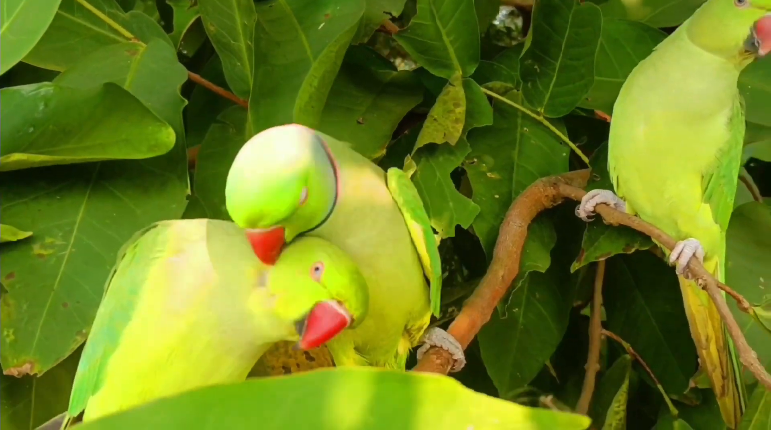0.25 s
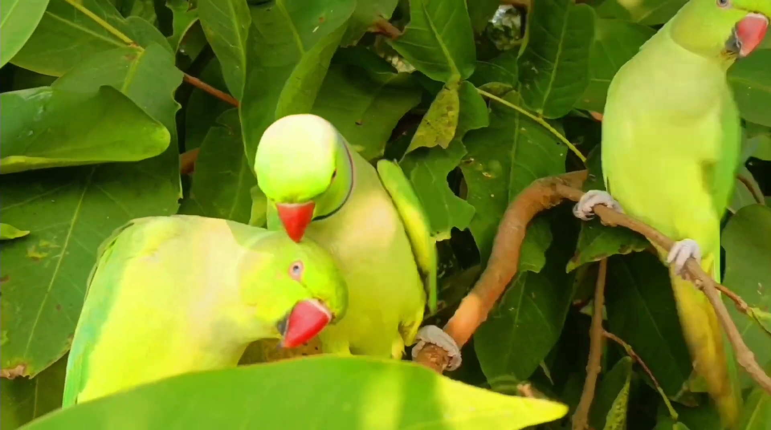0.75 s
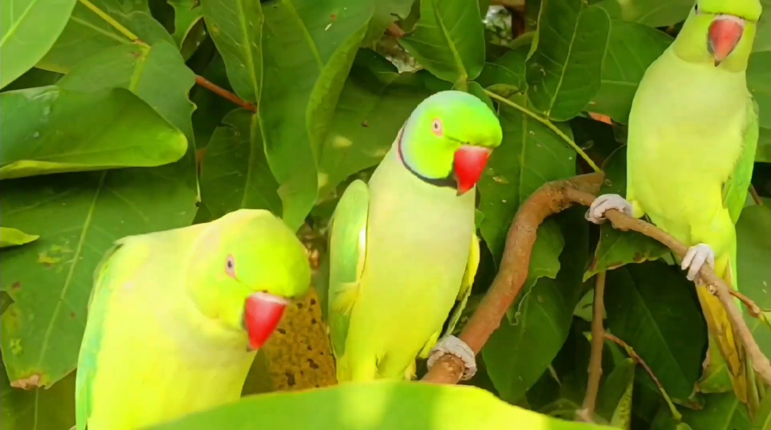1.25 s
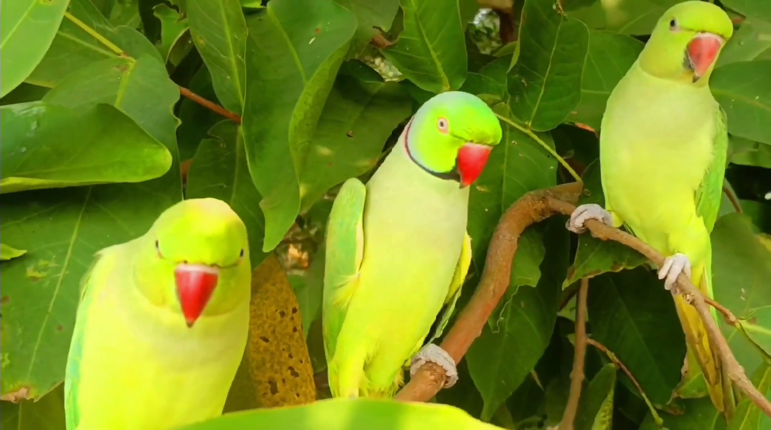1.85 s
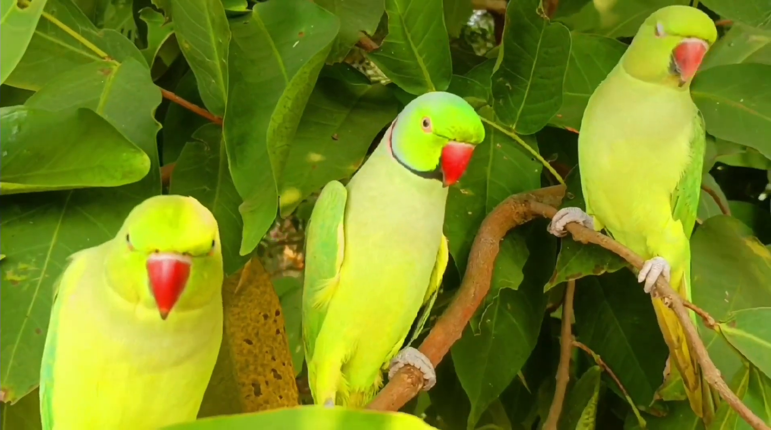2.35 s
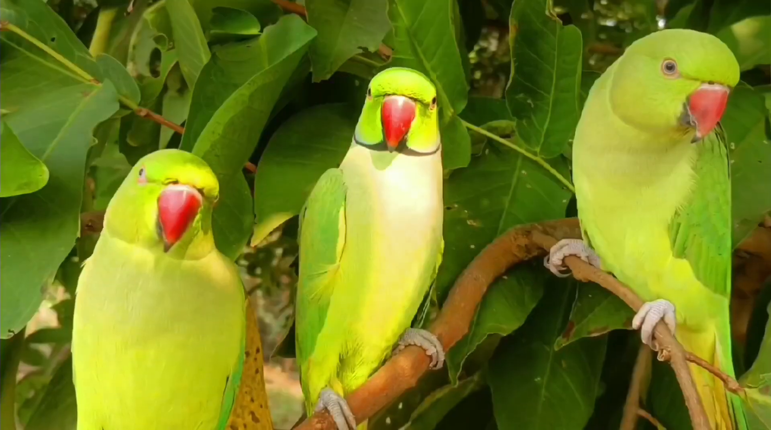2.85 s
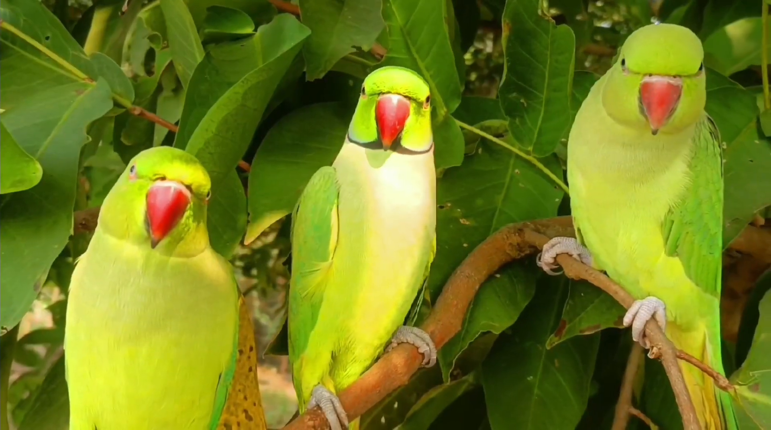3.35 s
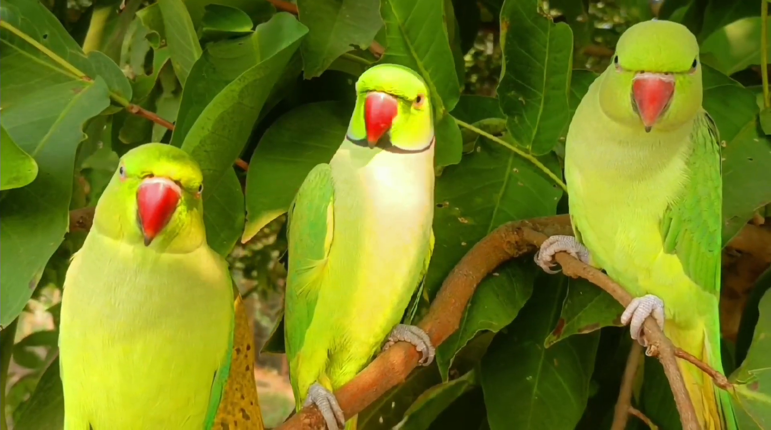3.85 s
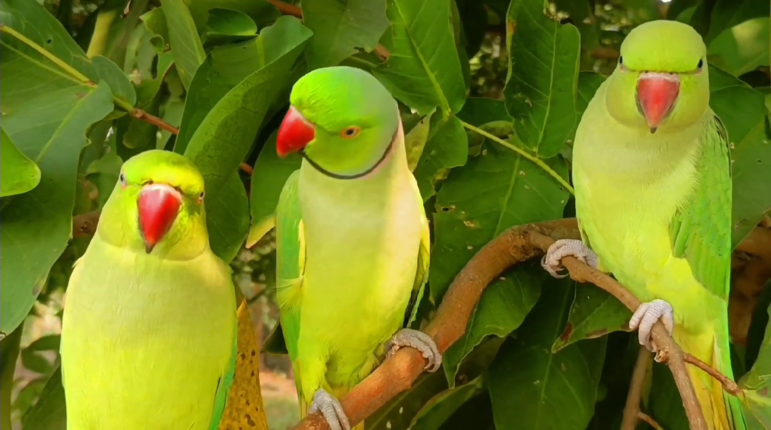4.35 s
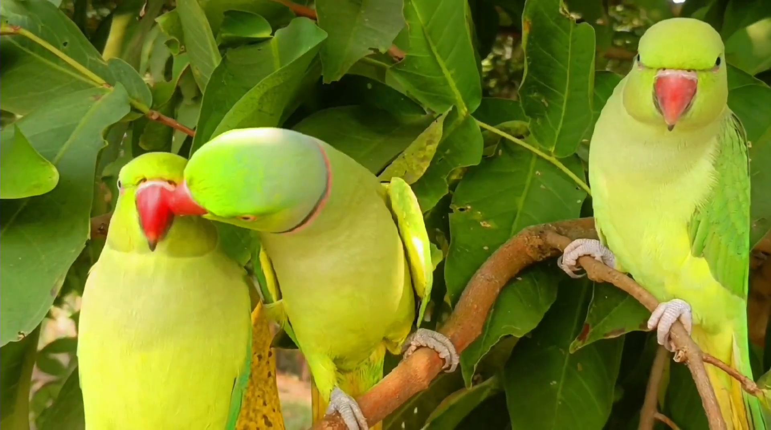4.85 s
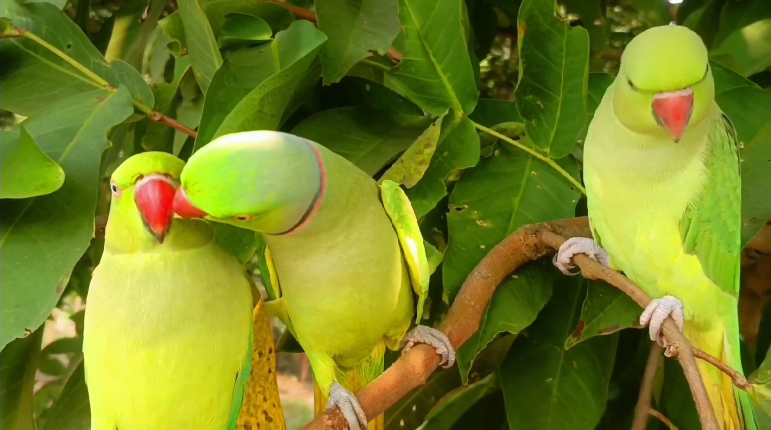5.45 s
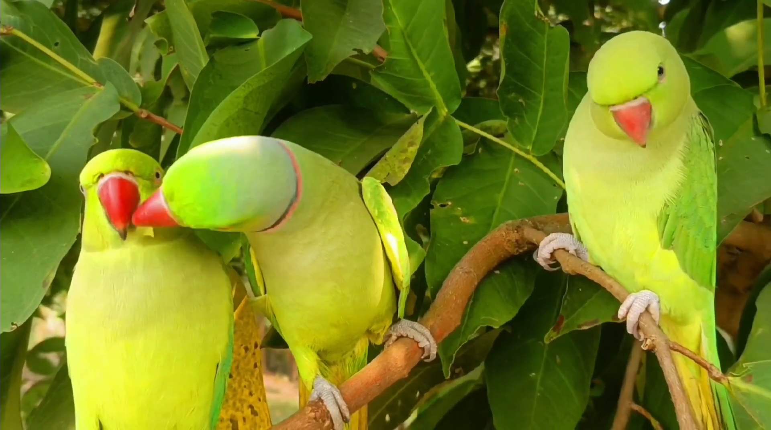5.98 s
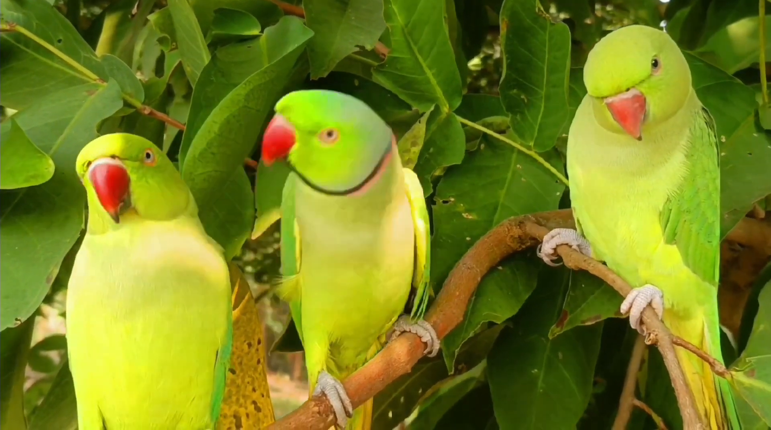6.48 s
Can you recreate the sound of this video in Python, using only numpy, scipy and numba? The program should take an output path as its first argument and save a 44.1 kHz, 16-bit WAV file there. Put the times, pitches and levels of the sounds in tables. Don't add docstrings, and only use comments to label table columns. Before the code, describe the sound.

A garden with steady low traffic-like hum, soft hiss and a faint haze of birdsong. At 0 s a close parakeet screeches loudly: a piercing falling onset breaks into a rough rasp, ending by 0.36 s. Feathers and dry leaves rustle until about 0.7 s, with dull twig knocks toward the right and a small tick. At 1.3 s the close rumble cuts out abruptly; distant twitters, thin paired peeps on the right and, from 1.8 to 4.4 s, a soft burred and clear warble are exposed. The rumble returns at 4.1 s with rustling and beak ticks. From 4.45 s a loud, clean squeal slowly rises and brightens, cracks at 5.05 s, then falls with airy hiss until 5.28 s. Taps precede a second, sharper rasping screech at 5.6-5.95 s. Light rustling, faint peeps and far twitters close the scene, to about 6.7 s.

```python
import sys
import numpy as np
from scipy import signal
from scipy.fft import rfft, irfft
from scipy.io import wavfile
from scipy.ndimage import uniform_filter1d
from numba import njit

SR = 44100
rng = np.random.default_rng(int(sys.argv[2]) if len(sys.argv) > 2 else 0)


def to_linear_factor(level_db):
    exponent = np.asarray(level_db, float) / 20
    return 10 ** exponent


def digitize_waveform(pressure):
    field = np.atleast_2d(pressure).T
    bounded = np.clip(field, -1, 1)
    quanta = np.round(bounded * 32767).astype(np.int16)
    wavfile.write(sys.argv[1], SR, quanta)


N = 296352
FLASH_HZ = 6440


def level(x, db):
    return x * to_linear_factor(db) / np.sqrt(np.mean(x ** 2))


def colour(x, spectrum):
    hz, db = np.transpose(spectrum)
    gain_db = np.interp(np.log(np.fft.rfftfreq(N, 1 / SR) + 1), np.log(hz), db)
    return irfft(rfft(x) * to_linear_factor(gain_db), N)


def band(x, lo_hz, hi_hz):
    sos = signal.butter(4, [lo_hz, hi_hz], "bandpass", fs=SR, output="sos")
    return signal.sosfiltfilt(sos, x)


def steady(x, span_s=0.018):
    return x / np.sqrt(uniform_filter1d(x ** 2, int(span_s * SR)) + 1e-12)


def walk(rate):
    k = max(int(SR / rate), 2)
    steps = np.repeat(rng.standard_normal(N // k + 1), k)
    return 1.3 * uniform_filter1d(uniform_filter1d(steps, k), k)[:N]


def echo(x, t60, wet_db):
    t = np.arange(int(.5 * SR)) / SR
    tail = rng.standard_normal(len(t)) * np.exp(-np.log(1000) * t / t60)
    tail = tail / np.sqrt(np.sum(tail ** 2))
    return x + to_linear_factor(wet_db) * signal.fftconvolve(x, tail)[:N]


@njit
def svf(x, hz, width):
    y, b, l = np.empty(len(x)), 0., 0.
    for i in range(len(x)):
        g, k = np.tan(np.pi * hz[i] / SR), width / hz[i]
        v = (b + g * (x[i] - l)) / (1 + g * (g + k))
        b, l, y[i] = 2 * v - b, l + 2 * g * v, k * v
    return y


def treble(x, flat_db):
    # (frequency [Hz], width [Hz], level [dB])
    capsule = [
        (5364, 290, 6),
        (6470, 30, 11),
        (7450, 3000, 2),
        (7900, 340, 5),
    ]
    modes = sum((-1) ** k * to_linear_factor(db) * svf(x, np.full(N, hz), width)
                for k, (hz, width, db) in enumerate(capsule))
    return modes + to_linear_factor(flat_db) * x


def swells(table, range_db):
    t = np.arange(N) / SR
    gain = 0
    for s, span, db, place in table:
        drop = np.interp(t, [s, s + place * span, s + span], [1, 0, 1])
        gain = gain + to_linear_factor(db - range_db * drop) * (t > s) * (t < s + span)
    return gain


def shaped(table, attack_s, attack_db, release_s, release_db, sag):
    (s, hz, db, beak), (end, low, last_db, last) = table[0], table[-1]
    release = [(end + u * release_s, low * sag ** u, last_db + u ** 1.5 * release_db, last)
               for u in (.33, .67, 1)]
    return [(s - attack_s, hz * 1.1, db + attack_db, beak), *table, *release]


def play(tables, fade_s=0.0015):
    t = np.arange(N) / SR
    s, *columns = np.transpose([row for table in tables for row in table])
    gate = sum((t >= table[0][0] - 1e-3) & (t <= table[-1][0] + 1e-3) for table in tables) > 0
    return [uniform_filter1d(gate * 1., int(fade_s * SR))] + [np.interp(t, s, c) for c in columns]


def syrinx(hz, rough, tilt, half, breath, patchy_db):
    shake = 0.5 * walk(1300) + .3 * walk(500) + .1 * walk(90)
    phase = 2 * np.pi * np.cumsum(hz * (1 + rough * shake)) / SR
    stack = 0
    for k in range(1, 22):
        size = k ** -tilt * to_linear_factor(patchy_db * np.tanh((k - 1) / 5) * walk(30))
        stack = stack + size * np.cos(k * phase + np.pi * k * k / 7) * (k * hz < 16000)
    cycle = to_linear_factor(7.2 * rough * walk(900) + 0.65 * walk(60)) * (1 + half * np.cos(phase / 2))
    return stack * cycle + (breath + 2.6 * rough) * rng.standard_normal(N)


def whistle(table, wobble, flutter_db, rise=0.18, edge_db=-9, arch_hz=0):
    out, waver, flutter = np.zeros(N), 1 + wobble * walk(180), to_linear_factor(flutter_db * walk(70))
    for s, span, from_hz, to_hz, db in table:
        i, u = int(s * SR), np.linspace(0, 1, int(span * SR))
        hz = from_hz + (to_hz - from_hz) * u + arch_hz * np.sin(np.pi * u)
        hz = hz * waver[i:i + len(u)]
        size = to_linear_factor(db + edge_db * np.interp(u, [0, rise, 1], [1, 0, 1]))
        size = size * np.clip(np.minimum(u, 1 - u) * span / .006, 0, 1)
        out[i:i + len(u)] += size * np.sin(2 * np.pi * np.cumsum(hz) / SR)
    return np.sqrt(2) * flutter * out


def hits(table, cycles):
    out, t = np.zeros((2, N + 2048)), np.arange(2048) / SR
    for s, db, hz, *pan_db in table:
        turns = t * hz / cycles
        ring = to_linear_factor(db) * np.e * turns * np.exp(-turns) * np.sin(2 * np.pi * hz * t)
        out[:, int(s * SR):int(s * SR) + 2048] += ring * to_linear_factor(sum(pan_db) * np.array([[.5], [-.5]]))
    return out[:, :N]


def garden():
    # (frequency [Hz], gain [dB])
    bed_mid = [(18, -52), (30, -27), (73, -3.5), (112, 3), (210, -12), (740, -18), (1250, -23.5),
               (4530, -31.5), (7470, -35.5), (8300, -45), (8980, -65), (11100, -69), (12000, -41),
               (13300, -29.5), (16000, -42)]
    bed_side = [(18, -46), (30, -17.5), (124, 0.5), (199, -6), (1540, -12), (2480, -17), (4530, -20.5),
                (5040, -21), (7470, -25), (8300, -30), (8980, -56), (11100, -56), (12000, -28),
                (13300, -21), (16000, -18)]
    # (time [s], length [s], peak level [dB], place of the peak [0-1])
    chorus = [
        (.9, 1.85, -70, .75),
        (2.78, .95, -70, .5),
    ]
    # (time [s], length [s], peak level [dB], place of the peak [0-1])
    leaves = [
        (.31, .19, -41.5, 0.1),
        (.46, .22, -46.5, 0.34),
    ]
    mid = level(colour(rng.standard_normal(N), bed_mid), -55) * to_linear_factor(0.11 * walk(9))
    side = level(colour(rng.standard_normal(N), bed_side), -61.5) * to_linear_factor(0.73 * walk(3))
    haze = level(band(rng.standard_normal((2, N)), 2900, 4850), 0)
    haze = haze * (to_linear_factor(-67.0) + swells(chorus, range_db=4)) * to_linear_factor(1.5 * walk(4.0))
    hiss = level(band(rng.standard_normal((2, N)), 4500, 8900), -77.0)
    stir = swells(leaves, range_db=14.0) * to_linear_factor(np.clip(5.9 * walk(61.85), -12, 5))
    stir = stir * level(band(rng.standard_normal(N), 620, 1030), -0.29)
    return mid + side * np.array([[1], [-1]]) + haze + hiss + stir * np.array([[.2], [1.6]])


def near_floor():
    # (frequency [Hz], gain [dB])
    near_colour = [(18, -73), (30, -40.5), (37, -45), (92, 4), (184, -7.5), (376, -24), (789, -23),
                   (2250, -36), (3630, -28), (4500, -32.5), (4960, -45), (5720, -33.5), (7440, -27),
                   (8380, -44.5), (9000, -75), (11700, -99), (19800, -120)]
    # (time [s], length [s], peak level [dB], place
    feathers = [(.33, .16, -44.5, 0.3), (.47, 0.22, -42.5, 0.6), (.8, .4, -69.5, 0.9),
                (1.12, 0.21, -48, 0.8), (4.04, 0.24, -43.5, 0.53), (4.26, 0.25, -49.5, 0.06),
                (5.26, 0.16, -47, .1), (5.485, 0.05, -50.5, .1), (5.92, .14, -42, .2),
                (6.05, .6, -57.5, 0.05), (6.55, 0.28, -63, 0.5)]
    off_s, on_s = 1.316, 4.131
    t = np.arange(N) / SR
    rustle = swells(feathers, range_db=21) + to_linear_factor(-70.5)
    noise = colour(rng.standard_normal(N), near_colour)
    rumble = level(band(noise, 13, 2700), 0) * to_linear_factor(-48.5 + 1.4 * walk(5.8))
    grain = to_linear_factor(1.7 * walk(150))
    soft = level(band(noise, 1800, 4450), -5)
    crisp = level(treble(band(noise, 5100, 9500), flat_db=-4), 0)
    fizz = level(band(rng.standard_normal(N), 11600, 15700), -73)
    return (rumble + fizz + grain * rustle * (soft + crisp)) * ((t < off_s) | (t > on_s))


def screech():
    # (time [s], pitch [Hz], level [dB], beak opening [0-1])
    screeches = [
        [(.005, 3073, -15, 0.96), (.013, 2618, -17.5, 0.8), (.032, 2177, -16.5, .4), (.06, 1893, -17.5, 0.2),
         (.086, 1072, -14, 0.2), (.13, 1120, -16, 0.33), (.205, 1170, -19, .6), (.265, 1350, -19.5, .9),
         (.3, 1210, -20, .87)],
        [(5.594, 3254, -13, 0.4), (5.606, 2645, -21.5, 0.6), (5.627, 2160, -15, 0.2), (5.655, 1986, -18.5, 0.3),
         (5.682, 1085, -14.5, 0.2), (5.75, 958.5, -16.5, .05), (5.805, 1090, -18, .4), (5.846, 1420, -19.5, .8),
         (5.885, 1190, -19.5, .86)],
    ]
    # (time after start [s], roughness [0-1])
    rough_curve = [(.075, .03), (.095, .08), (.112, .3), (.215, .3), (.245, .14), (.265, .085),
                   (.295, .085), (.305, .36)]
    # (time after start [s], share of the tongue's climb [0-1], strength of its ring [0-1])
    tongue = [
        (.085, 0, .15),
        (.115, .15, 1),
        (.23, .35, 1),
        (.265, 1, .45),
        (.31, .5, .4),
    ]
    # (frequency [Hz], gain [dB])
    harsh = [(240, -62), (400, -50), (645, -20), (921, -12), (1350, -14.5), (1870, -4.5), (2180, -8),
             (3210, -9), (4250, -11), (4750, -36), (4950, -34), (5350, -20), (6640, -16), (8450, -29.5),
             (8950, -55), (10100, -57.5), (12100, -28.5), (16000, -54)]
    # (time [s], length [s], from [Hz], to [Hz], level [dB])
    flares = [(.024, .022, 6600, 6200, -17), (.044, .016, 6180, 5850, -29), (.04, .047, 7620, 6700, -31),
              (.228, .068, 6810, 6950, -25), (.258, .036, 5300, 5460, -24), (.258, .016, 6440, 6450, -27),
              (5.616, .022, 6506, 6480, -18), (5.645, .035, 7566, 6760, -31.5),
              (5.85, .028, 5740, 5200, -23), (5.884, .014, 5750, 5300, -27.5),
              (5.858, .026, 6950, 6750, -25), (5.893, 0.049, 7430, 7520, -32)]
    shut_db, open_db = -22, 0.5
    t = np.arange(N) / SR
    gate, hz, db, beak = play([shaped(call, attack_s=0.003, attack_db=-12.5, release_s=0.056,
                                      release_db=-22.0, sag=.85) for call in screeches])
    second = t > 3

    def each(first_bird, second_bird):
        return np.where(second, second_bird, first_bird)

    age = t - each(screeches[0][0][0], screeches[1][0][0]) + .008
    when, climb, ring = np.transpose(tongue)
    rest_hz, tongue_top_hz = each(2400, 3050), each(2680, 4060)
    tongue_hz = rest_hz + (tongue_top_hz - rest_hz) * np.interp(age, when, climb)
    flash_db = 5 * np.exp(-((3 * hz - FLASH_HZ) / 170) ** 2)
    top_db = shut_db + (open_db - shut_db) * beak + flash_db
    rough = np.interp(age, *np.transpose(rough_curve))
    source = syrinx(hz, rough, tilt=.45, half=.03, breath=.15, patchy_db=5.5)
    tongue_ring = to_linear_factor(each(10, 11)) * np.interp(age, when, ring) * svf(source, tongue_hz, 500.)
    voice = colour(source + tongue_ring, harsh)
    palate = to_linear_factor(each(5.5, -6)) * np.interp(age, [.12, .17, .23, .26], [0, 0.97, 1, .2])
    voice = voice + palate * svf(voice, np.full(N, 3380.), 420.)
    opening = np.interp(age, [.02, .026, .055, .075], [0, 1, 1, 0])
    voice = voice + (to_linear_factor(each(-9.5, 0) * opening) - 1) * svf(voice, np.minimum(2 * hz, 9000.), 900.)
    voice = voice - .7 * (age < .09) * ~second * svf(voice, np.minimum(3 * hz, 9000.), 800.)
    voice = voice + (to_linear_factor(each(-2.5, -1)) - 1) * band(voice, 470, 1200)
    top = colour(source + .5 * rng.standard_normal(N), harsh)
    top = steady(treble(band(top, 5050, 16500), flat_db=-8), span_s=.02)
    thin = to_linear_factor(-26.0) * np.sin(2 * np.pi * 12576 * t)
    calls = steady(band(voice, 470, 4600), span_s=0.009) + to_linear_factor(top_db) * (top + thin)
    flared = whistle(flares, wobble=0.0045, flutter_db=2.5, rise=0.28, edge_db=-9.5)
    return gate * to_linear_factor(db) * calls + flared


def twig_knocks():
    # (time [s], peak level [dB], frequency [Hz], left minus right [dB])
    knocks = [(0.163, -25, 1070, -10), (0.347, -29.5, 620, -13), (0.358, -34.5, 465, -29),
              (0.574, -40, 776, -19.5), (0.61, -34.5, 800, -13), (1.036, -52, 430, -25),
              (1.231, -49, 549, -19), (1.287, -51, 366, -27), (1.413, -44.5, 745, -18),
              (1.534, -35.5, 564, -18.5), (2.081, -46, 450, -25), (3.815, -49, 446, -18),
              (4.551, -33, 730, -17)]
    return hits(knocks, cycles=0.17)


def beak_ticks():
    # (time [s], peak level [dB], frequency [Hz])
    ticks = [(0.6485, -38, 3930), (0.8589, -49, 3750), (4.1679, -34, 6300), (4.2727, -41, 7320),
             (4.2922, -40.5, 7450), (5.4921, -38.5, 5550), (5.5094, -47, 7500)]
    # (time [s], peak level [dB], frequency [Hz])
    taps = [
        (4.1677, -41.5, 1620),
        (4.2735, -32.5, 1580),
        (5.4884, -54, 2060),
        (5.5873, -30, 1720),
    ]
    return hits(ticks, cycles=1.5) + hits(taps, cycles=.7)


def far_twitter():
    # (time [s], length [s], from [Hz], to [Hz], level [dB])
    twitter = [(1.02, 0.038, 3740, 4030, -62), (1.04, 0.12, 3170, 3070, -73), (1.19, 0.12, 4200, 3720, -61),
               (1.23, 0.066, 3310, 3240, -66), (1.34, 0.035, 3270, 2920, -64.5),
               (1.37, 0.073, 3880, 4100, -62), (1.39, 0.051, 4500, 4340, -72),
               (1.46, 0.064, 3435, 3400, -65), (1.52, 0.077, 3800, 3290, -64),
               (1.57, 0.045, 3700, 3810, -66.5), (1.71, 0.08, 3777, 3400, -62.5),
               (1.77, 0.078, 3390, 3430, -71), (1.8, 0.035, 4000, 4480, -66), (1.835, .04, 4500, 4380, -64),
               (1.93, 0.039, 4100, 3830, -63.5), (2.02, 0.092, 3940, 3770, -68),
               (2.01, 0.073, 3330, 3530, -68), (2.27, 0.19, 2870, 3260, -69.5),
               (2.31, 0.08, 4580, 4700, -64), (2.42, 0.03, 3900, 4050, -64.5), (2.47, .07, 4000, 3950, -67),
               (2.44, .06, 3720, 3720, -67), (2.42, .08, 4450, 4350, -69), (2.48, 0.11, 3430, 3730, -68),
               (2.56, 0.075, 4000, 4160, -61), (2.59, 0.06, 4450, 4320, -65),
               (2.84, 0.036, 3280, 3180, -72), (3.1, 0.098, 3420, 3170, -70.5),
               (3.2, 0.08, 3550, 3320, -72.5), (3.3, 0.09, 3280, 3580, -70), (3.5, 0.095, 3900, 3780, -71),
               (1.41, 0.043, 4150, 3950, -65), (1.55, 0.055, 3170, 3100, -70),
               (2.1, 0.067, 3850, 3700, -72), (6.05, 0.083, 2460, 2380, -65.5),
               (6.13, 0.064, 3650, 3750, -68), (6.27, .04, 3670, 4000, -66), (6.35, .06, 3320, 3350, -69),
               (6.4, 0.094, 3630, 3540, -64), (6.52, 0.072, 3410, 3700, -68), (6.6, .1, 3580, 3700, -66.5),
               (6.66, .05, 3090, 3000, -65)]
    return echo(whistle(twitter, wobble=.018, flutter_db=3, edge_db=-5), t60=.6, wet_db=2)


def side_peeps():
    # (time [s], length [s], from [Hz], to [Hz], level [dB])
    peeps = [(s + gap, .125, 4760, 4780, db) for s, db in ((1.36, -64), (2.84, -63.5),
             (6.09, -65.5)) for gap in (0, .16)]
    notes = whistle(peeps, wobble=.028, flutter_db=4, rise=.45, edge_db=-4, arch_hz=340)
    return echo(notes, t60=.3, wet_db=7) * np.array([[.09], [.45]])


def far_warbler():
    # (time [s], length [s], from [Hz], to [Hz], level [dB])
    burr = [(1.8, 0.049, 2970, 2340, -70), (1.91, 0.12, 2245, 2440, -61), (2.135, 0.094, 2950, 3080, -66),
            (2.19, 0.06, 3080, 3650, -63), (3.27, 0.086, 2417, 2830, -56.5),
            (3.64, 0.093, 1786, 2420, -60.5), (3.72, 0.13, 2570, 2600, -56.5), (3.74, 0.1, 2885, 2930, -65),
            (3.82, 0.24, 2464, 2455, -60.5), (3.87, 0.11, 2170, 1850, -63.5), (3.9, .12, 2350, 2255, -63.5),
            (4.04, 0.082, 2560, 3000, -60), (4.09, 0.062, 3030, 3000, -58)]
    # (time [s], length [s], from [Hz], to [Hz], level [dB])
    warble = [(2.645, .115, 2340, 2120, -50.5), (2.775, .025, 2500, 2480, -58), (2.78, .1, 2180, 2200, -62),
              (2.895, .02, 2480, 2540, -58), (2.9, .095, 2030, 2110, -52.5), (2.99, .06, 2050, 1560, -59),
              (3.07, .07, 1520, 1800, -55), (3.14, .06, 1760, 1780, -63), (3.205, .06, 2140, 1930, -54),
              (3.375, .06, 2540, 2230, -54), (3.43, .09, 2220, 2220, -58), (3.52, .1, 2220, 2230, -65),
              (4.31, .06, 2480, 2290, -55), (4.36, .1, 2290, 2240, -55)]
    burred = echo(whistle(burr, wobble=.035, flutter_db=3.5), t60=.6, wet_db=-3)
    clear_notes = whistle(warble, wobble=.005, flutter_db=2.5, edge_db=-6)
    return burred + echo(clear_notes, t60=.7, wet_db=-7)


def squeal():
    # (time [s], pitch [Hz], level [dB], beak opening [0-1])
    calls = [
        [(4.45, 740.4, -15, -.1), (4.49, 720, -14, 0.2), (4.61, 745.6, -13, 0.25), (4.7, 780.7, -14.5, 0.02),
         (4.88, 855.6, -15, .05), (5.0, 930, -18, .15), (5.036, 962, -17, 0.4), (5.054, 1036, -15.5, .7)],
        [(5.072, 988.5, -22, .55), (5.088, 981, -22.5, .55), (5.12, 899.5, -17, .4), (5.146, 863.6, -17, .9),
         (5.226, 659, -23, 1), (5.25, 605, -22.5, 0.73)],
    ]
    # (frequency [Hz], gain [dB])
    clear = [(350, -27.5), (600, -16.5), (1490, 4.5), (2240, -13.5), (2910, -30), (4160, -18),
             (5190, -52.5), (6200, -23.5), (7310, -23.5), (8860, -56.5), (10700, -55), (11500, -32.5),
             (12000, -31.5), (13400, -39), (16000, -62)]
    # (time [s], length [s], from [Hz], to [Hz], level [dB])
    overtone = [
        (4.5, 0.57, 6870, 7460, -32.5),
        (5.12, .135, 7420, 6780, -27),
        (5.195, 0.072, 7700, 7490, -28.5),
        (4.7, .29, 9400, 10000, -45),
        (4.9, .15, 12200, 10000, -51.5),
        (5.085, .09, 12000, 12600, -49.5),
        (4.8, .22, 12950, 13450, -58.5),
    ]
    crack_s, healed_s = 5.049, 5.063
    brightest_db = -15
    t = np.arange(N) / SR
    gate, hz, db, beak = play([
        shaped(calls[0], attack_s=0.014, attack_db=-36.5, release_s=0.013, release_db=3.0, sag=0.98),
        shaped(calls[1], attack_s=0.004, attack_db=0, release_s=.033, release_db=-34, sag=.9)])
    db = uniform_filter1d(db, int(.004 * SR))
    fallen = t > crack_s
    crack = uniform_filter1d((fallen & (t < healed_s)) * 1., int(.008 * SR))
    rough = np.where(t < crack_s, .004, .007) + .09 * crack
    chest_db = 8 * (t < healed_s) * np.exp(-((hz - 972) / 35) ** 2)
    low_db = -8 - 3 * beak - 12 * crack + chest_db + 1.8 * walk(30)
    mid_db = -28 + 26 * beak + 2.5 * walk(14)
    top_db = np.minimum(-37.0 + 41 * (t - calls[0][0][0]), brightest_db) + 6 * beak ** 2 - 7 * crack
    half = np.interp(t, [4.5, 4.75, crack_s, healed_s], [.01, .055, .055, .015]) * to_linear_factor(4 * walk(90))
    voice = colour(syrinx(hz, rough, tilt=.25, half=half, breath=.08, patchy_db=4.5), clear)
    parts = steady(band(voice, 1280, 2500)) + to_linear_factor(low_db) * steady(band(voice, 450, 1100))
    air = rng.standard_normal(N) * to_linear_factor(np.clip(2.5 * walk(240), -6, 3))
    below = steady(band(voice, 1950, 2550))
    above = steady(band(voice, 3250, 4600) + .3 * band(voice, 2850, 3250))
    parts += to_linear_factor(mid_db) * (to_linear_factor(-8.0) * below + to_linear_factor(-8 * crack) * above)
    spit = level(band(air, 2200, 2505) + 0.23 * band(air, 3000, 3400), -2)
    parts = parts * to_linear_factor(-3 * crack) + crack * spit
    parts += to_linear_factor(1.3 * mid_db) * np.where(t < crack_s, .3, 1) * level(band(air, 2900, 4400), -9)
    open_air = np.interp(t, [crack_s, healed_s, 5.13, 5.2, 5.24], [0, 1, 1, .5, 1])
    parts += open_air * level(band(air, 1100, 2500) + band(air, 2900, 4400), -17)
    shrill = .6 * band(voice, 5000, 7800) + to_linear_factor(12) * svf(voice, np.full(N, 1. * FLASH_HZ), 260.)
    shrill += to_linear_factor(top_db - brightest_db - 9) * band(voice, 8200, 16500)
    hiss = level(treble(band(air, 6300, 7800), flat_db=-7.0), -7.5)
    hiss += level(band(air, 7800, 8500), -28) + level(band(air, 11500, 12300), -22)
    hiss += fallen * (level(band(air, 9100, 10000), -8) + level(band(air, 5100, 6300), -8.5))
    hiss += np.clip(beak, 0, 1) * level(band(air, 13800, 15400), -26)
    parts += to_linear_factor(top_db - 0.5) * (steady(treble(shrill, flat_db=-3.5)) + hiss)
    whistled = whistle(overtone, wobble=0.0012, flutter_db=4.0, rise=0.72, edge_db=-10.5)
    return gate * to_linear_factor(db) * parts + whistled


def scene():
    birds = echo(screech() + squeal(), t60=.17, wet_db=-17)
    rounded = 0.71 * np.tanh(birds / 0.7)
    near = band(rounded, 380, 16500) + near_floor()
    far = far_twitter() + far_warbler()
    return near + far + side_peeps() + garden() + twig_knocks() + beak_ticks()


def band_limit(x):
    return signal.sosfilt(signal.butter(12, 16400, fs=SR, output="sos"), x)


def record(dry):
    hz = np.fft.rfftfreq(N, 1 / SR)
    gap = np.where((hz > 8650) & (hz < 11550), to_linear_factor(-19.0), 1)
    low_cut = 1 / (1 + (30 / (hz + 1)) ** 4)
    mix = irfft(rfft(dry) * gap * (hz < 15730) * low_cut, N)
    return band_limit(mix)


dry = scene()
out = record(dry)
digitize_waveform(out)
```